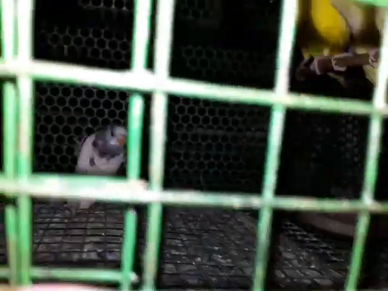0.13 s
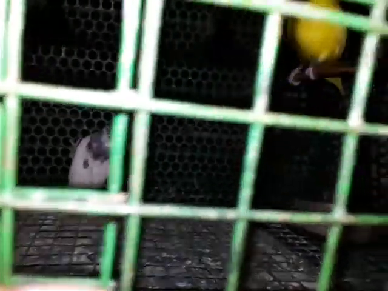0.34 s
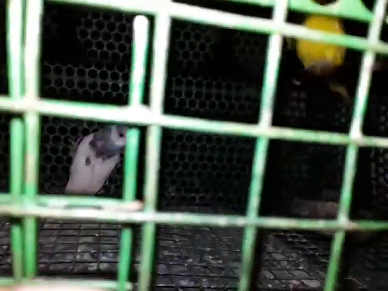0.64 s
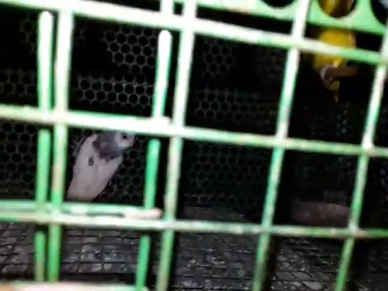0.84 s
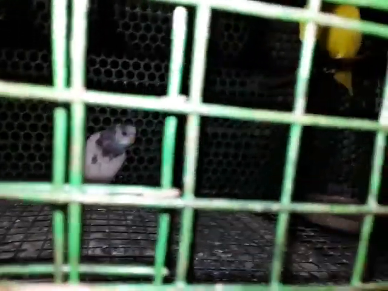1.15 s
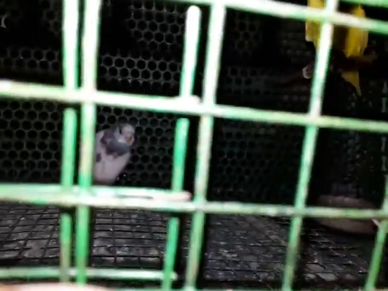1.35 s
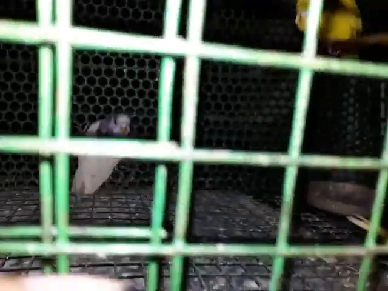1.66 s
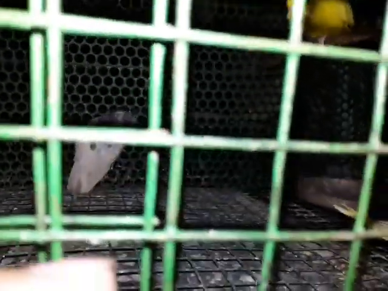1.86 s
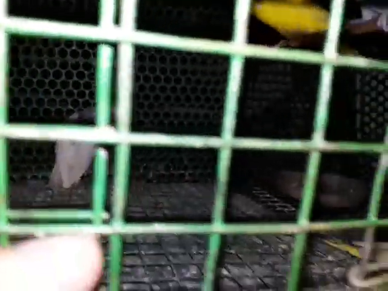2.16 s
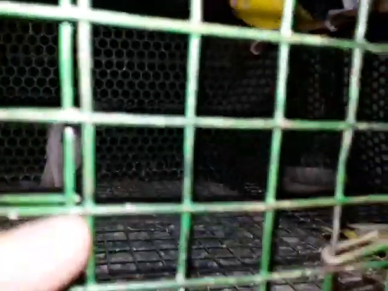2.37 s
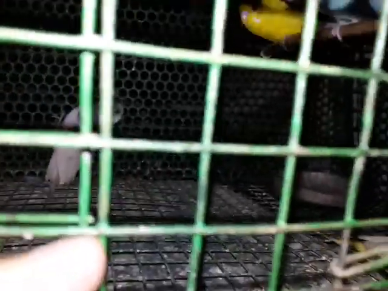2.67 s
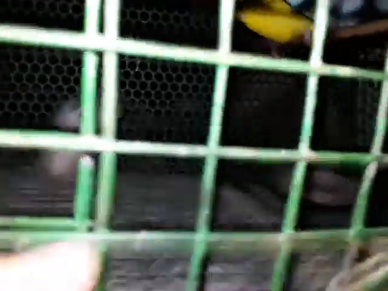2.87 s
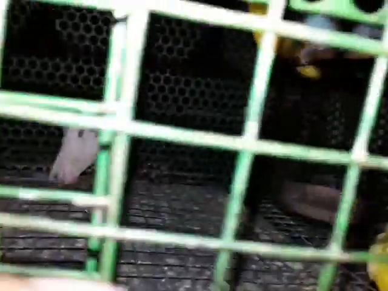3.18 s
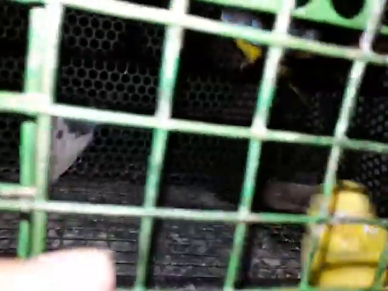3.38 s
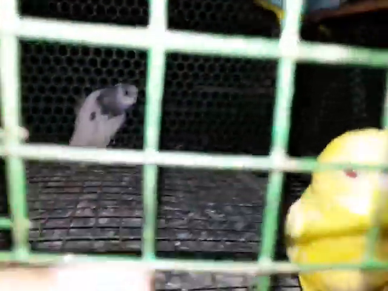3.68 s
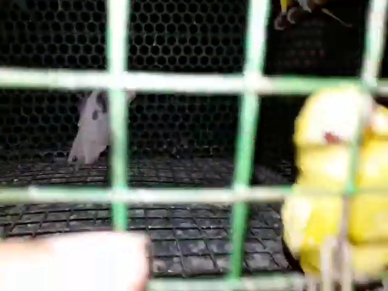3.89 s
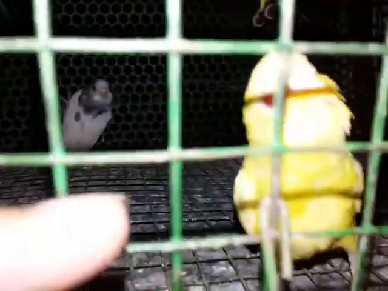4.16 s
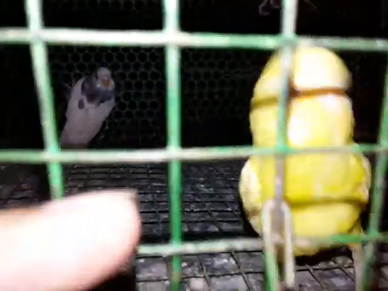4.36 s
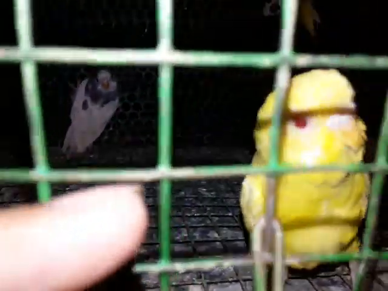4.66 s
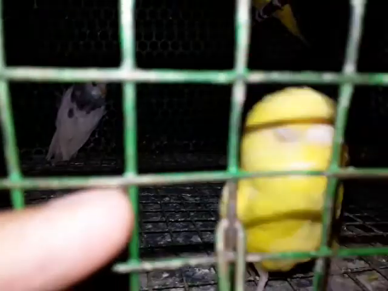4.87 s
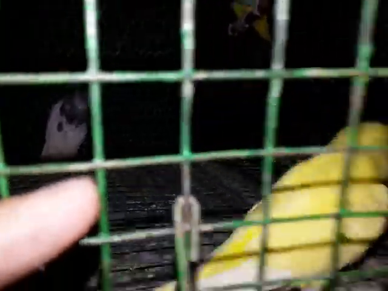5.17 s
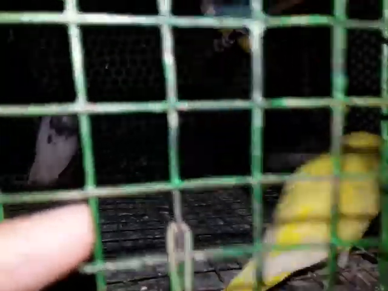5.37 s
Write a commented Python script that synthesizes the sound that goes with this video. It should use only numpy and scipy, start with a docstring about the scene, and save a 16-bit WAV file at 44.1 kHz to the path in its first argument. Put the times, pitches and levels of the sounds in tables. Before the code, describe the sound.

A quiet small room with a soft low hush, heard from just outside a wire cage of young budgerigars. Faint rustling never quite stops. From 0.1 to 1.5 seconds a few weak, high, wavering peeps come from further back, with soft wing flutters around 0.4 to 0.9 and light knocks on the bars. At 1.7 a rough, rapid warble lasts under a quarter second. Around 2.1 feathers hiss along the mesh and a thin, breathy whistle swells until about 2.9. From 2.64 to 3.0 one bird flaps hard, thumping and shaking the cage, with ringing metallic knocks and a sharp bright click. A loud, zigzagging, trilled chirp follows at 3.15, then scattered claw ticks to 3.7 and a small flutter. After near quiet, a short harsh two-pulse rasp sounds at 4.13. Rustling rises again, with a last cluster of claw ticks between 5.1 and 5.4.

```python
"""Young budgerigars in a wire cage in a small room, heard from just outside the bars.
First a bird peeps further away, gliding sine tones, over filtered noise for the room and faint low tones.
Wing beats (noise bursts and feather clicks) bump the cage, then a rough warble and a thin noise whistle come in.
One bird flaps hard, shaking the cage and ringing its bars, and chirps loudly; a short rasp of pulses follows.
Claw ticks run through to a last cluster, with feathers brushing the mesh and an unbroken faint rustle."""
import sys
import numpy as np
from scipy import signal
from scipy.fft import rfft, irfft
from scipy.io import wavfile

SR = 44100
rng = np.random.default_rng(int(sys.argv[2]) if len(sys.argv) > 2 else 0)


def wav_out(sig):
    """Save sig, one row per channel (or a flat mono array), as 16-bit PCM at SR to the path in sys.argv[1]."""
    wavfile.write(sys.argv[1], SR, np.round(np.clip(np.atleast_2d(sig).T, -1, 1) * 32767).astype(np.int16))


N = 243873
T = np.arange(N) / SR


def undb(db):
    """Decibels to gain."""
    return 10 ** (np.asarray(db) / 20)


def unit(x):
    """Scale to rms 1."""
    return x / np.sqrt(np.mean(x ** 2) + 1e-18)


def white():
    """White noise as long as the scene."""
    return rng.standard_normal(N)


def colour(x, points):
    """Filter by a causal, minimum-phase response through (Hz, dB) points; white noise keeps its power."""
    hz, db = np.transpose(points)
    size = 8192
    log_hz = np.log(np.fft.rfftfreq(size, 1 / SR) + 1)
    gain = unit(undb(np.interp(log_hz, np.log(hz), db)))
    # folding the cepstrum forward in time makes the response causal
    cepstrum = irfft(np.log(gain + 1e-9))
    cepstrum[1:size // 2] *= 2
    cepstrum[size // 2 + 1:] = 0
    response = irfft(np.exp(rfft(cepstrum)))
    return signal.fftconvolve(x, response)[:len(x)]


def resonate(x, hz, width_hz):
    """One resonance, gain 1 at its centre."""
    hz = min(hz, SR * .45)
    b, a = signal.iirpeak(hz, hz / min(width_hz, SR / 4), fs=SR)
    return signal.lfilter(b, a, x)


def ring_modes(x, modes):
    """Sum of resonances, one per (Hz, width Hz, dB) row."""
    return sum(undb(db) * resonate(x, hz, width_hz) for hz, width_hz, db in modes)


def walk(rate):
    """Random drift with a spread near 1: straight lines between `rate` random points a second."""
    knots = rng.standard_normal(N // 8)
    return np.interp(T * rate, np.arange(len(knots)), knots)


def grains(rate, spread_db):
    """Tiny clicks of very unequal size, `rate` a second on average, as from feather barbs."""
    sizes = undb(spread_db * np.minimum(rng.exponential(size=N), 5))
    return unit((rng.random(N) < rate / SR) * rng.standard_normal(N) * sizes)


def swells(rows):
    """Gain of sounds that rise evenly, hold and die away exponentially; their powers add."""
    power = np.zeros(N)
    for s, rise, hold, decay, db in rows:
        past = np.maximum(T - s - rise - hold, 0)
        power += (undb(db) * np.clip((T - s) / rise, 0, 1) * np.exp(-past / decay)) ** 2
    return np.sqrt(power)


def arc(u, start, middle, end):
    """Pitch that bends through three values as u runs from 0 to 1."""
    return np.polyval(np.polyfit([0, .5, 1], [start, middle, end], 2), u)


def glides(rows, waver, waver_rate):
    """Soft, wavering sine notes that swell and fade along an arc of pitch."""
    out, drift = np.zeros(N), 1 + waver * walk(waver_rate)
    for s, length, start_hz, middle_hz, end_hz, db in rows:
        u = np.clip((T - s) / length, 0, 1)
        phase = 2 * np.pi * np.cumsum(arc(u, start_hz, middle_hz, end_hz) * drift) / SR
        out += undb(db) * np.sqrt(8 * u * (1 - u)) * np.sin(phase)
    return out


def room(x, wet_db, t60=0.3, treble_t60=0.29, near_db=-9, near_s=0.0074):
    """Direct sound, quick reflections from the cage tray and walls, and the tail of a small room."""
    t = T[:SR // 2]
    noise = rng.standard_normal(len(t))
    low = signal.sosfiltfilt(signal.butter(2, 5500, fs=SR, output="sos"), noise)
    tail = low * undb(-60 * t / t60) + (noise - low) * undb(-60 * t / treble_t60)
    tail *= t > .006
    # sparse random echoes
    near = rng.standard_normal(len(t)) * (rng.random(len(t)) < .03) * np.exp(-t / near_s) * (t > .002)
    response = (undb(wet_db) * unit(tail) + undb(near_db) * unit(near)) / np.sqrt(len(t))
    return x + signal.fftconvolve(x, response)[:N]


# Tone of the quiet room. Each row: frequency in Hz, relative level in dB.
ROOM_COLOUR = [(25, -22.5), (60, -4.5), (115, 2), (400, -6.5), (700, -13.5), (2200, -23), (4700, -23.5),
               (7000, -37), (9700, -20), (15800, -22)]


def room_tone():
    """Steady filtered noise, its level drifting slightly."""
    return colour(white(), ROOM_COLOUR) * undb(-65.5 + 0.76 * walk(14))


# Faint low tones. Each row: start in seconds, length in seconds, start, middle and end pitch in Hz
# before the waver, relative level in dB.
FAR_TONES = [(.215, .14, 335, 325.3, 335, -55.5), (.47, 0.2, 519, 532, 510, -62),
             (3.37, 0.12, 394.2, 418.5, 448, -50.5)]


def far_tones():
    """Low gliding sines with more reverberation than direct sound."""
    return room(glides(FAR_TONES, waver=0.036, waver_rate=120) * undb(-4.5), wet_db=3.5)


# Faint whistle. Each row: start, rise, hold and decay in seconds, level in dB.
WHISTLE_SWELLS = [(2.1, 0.4, 0.31, 0.081, -61), (4.68, 0.21, 0.3, 0.048, -70.5)]


def whistle():
    """Noise through two equal narrow resonances in a row gives a thin, unsteady whistle."""
    hz, width_hz = 1335, 150  # of each resonance
    narrow = resonate(resonate(white(), hz, width_hz), hz, width_hz)
    return unit(narrow) * swells(WHISTLE_SWELLS)


# Bouts of rustling as the birds move. Each row: start, rise, hold and decay in seconds, relative level in dB.
RUSTLE_BOUTS = [(0, 0.0021, .62, 0.02, -68), (1.9, 0.14, 0.75, 0.066, -65), (2.83, 0.046, 0.83, 0.17, -60),
                (4.7, 0.57, 0.016, 0.2, -67.5)]
# Tone of the rustle. Each row: frequency in Hz, relative level in dB.
RUSTLE_TONE = [(400, -14), (1300, -1), (2200, -8), (4400, -8.5), (7000, -27), (9700, -14), (15500, -21)]
# Hollow tone of the cage, also of the wing air. Each row: frequency in Hz, relative level in dB.
HOLLOW_TONE = [(100, -22.5), (250, -6.5), (400, -2), (1100, -13), (2500, -41.5)]
# Cage shaking under the flapping. Each row: start, rise, hold and decay in seconds, relative level in dB.
SHAKE_SWELLS = [(2.82, .03, .16, 0.17, -55)]
# Modes of the cage and its tray, rung by the wings too; the first colours the shake.
# Each row: frequency in Hz, width in Hz, relative level in dB.
CAGE_MODES = [(370, 21, 3), (837, 97, 0.5), (1224, 99, -9.5), (1574, 160, -15)]


def stirring():
    """Small movements rustle, sound the hollow cage and shake it."""
    fidget_db = -74.5  # floor of movement that never stops
    movement = np.hypot(swells(RUSTLE_BOUTS), undb(fidget_db))
    rustle = colour(grains(rate=2600, spread_db=1.5), RUSTLE_TONE) * undb(2 * walk(37) - 0.5)
    hollow = colour(white(), HOLLOW_TONE) * undb(2 * walk(26))
    shake = colour(white(), [(25, -24.5), (55, -7.5), (85, -0.5), (200, -11), (1500, -71.0)])
    tray_hz, tray_width_hz, _ = CAGE_MODES[0]
    tray = unit(resonate(white(), tray_hz, tray_width_hz))
    shaking = (undb(0.5) * shake + undb(-2.5) * tray) * swells(SHAKE_SWELLS)
    return (rustle + hollow) * movement + shaking


# Strokes along the mesh. Each row: start, rise, hold and decay in seconds, level in dB before the flicker.
BRUSH_STROKES = [(.875, 0.024, 0.028, 0.035, -64), (2.134, 0.0086, 0.037, 0.028, -47),
                 (2.17, 0.11, 0.096, 0.027, -51.5), (2.989, 0.0092, .003, .0213, -40.5),
                 (3.055, 0.039, 0.0046, 0.041, -47)]
# Tone of the brushing. Each row: frequency in Hz, relative level in dB.
BRUSH_TONE = [(1180, -43.5), (2000, -13.5), (3120, -10.5), (4670, -1), (6810, -16.5), (9680, 2),
              (15500, -18)]


def brushing():
    """Fine friction along the mesh: very dense clicks blur into a flickering hiss."""
    hiss = colour(grains(rate=56000, spread_db=2.0), BRUSH_TONE) * undb(1.2 * walk(83))
    return hiss * swells(BRUSH_STROKES)


# Far bird's peeps. Each row: start in seconds, length in seconds, start, middle and end pitch in Hz
# before the waver, relative level in dB.
FAR_PEEPS = [(.09, 0.049, 2136, 2202, 2180, -66), (.735, 0.046, 2350, 2320, 2130, -68.5),
             (1.128, 0.099, 2100, 2130, 2334, -61.5), (1.388, 0.064, 2010, 2214, 2050, -64)]


def far_peeps():
    """Wavering, gliding sines from a bird further away, well into the room sound."""
    return room(glides(FAR_PEEPS, waver=0.0394, waver_rate=350) * undb(-2.0), wet_db=-1.5)


# Claws and beaks on the wire. Each row: start in seconds, relative level in dB, brightest frequency in Hz.
CLAW_TICKS = [(0.506, -56, 5200), (2.044, -50, 3450), (2.9826, -31.5, 7140), (3.298, -41.5, 5000),
              (3.381, -47, 5540), (3.459, -50, 4460), (3.669, -44.5, 5180), (5.14, -54, 4630),
              (5.164, -47, 3350), (5.221, -45.5, 7120), (5.269, -47.5, 5540), (5.339, -44, 3730)]
# Modes of the wire. Each row: frequency in Hz, width in Hz, relative level in dB.
WIRE_MODES = [(3854, 522, -4), (4660, 610, 3), (5660, 110, -9.5)]


def claws():
    """A sharp contact rings the wire for a few milliseconds and knocks the tray faintly."""
    out, t = np.zeros(N), T[:SR // 20]
    for s, db, bright_hz in CLAW_TICKS:
        contact = rng.standard_normal(len(t)) * np.exp(-t / .0006)
        tick = resonate(contact, bright_hz, 0.4 * bright_hz)
        i = int(s * SR)
        out[i:i + len(t)] += undb(db + 6.5) * tick / np.abs(tick).max()
    ring = ring_modes(out, WIRE_MODES)
    knock = resonate(out, 380, 200) + resonate(out, 1277, 400)
    return room(out + undb(3.0) * ring + undb(3.0) * knock, wet_db=-11.0, near_db=-9.0)


# Feet and bodies on the bars. Each row: start in seconds, direct peak level in dB,
# brightest frequency of the contact in Hz.
BAR_KNOCKS = [(.394, -52, 3500), (1.012, -44.5, 3700), (1.974, -46.5, 4000), (2.64, -55, 3800),
              (2.697, -43.5, 3300), (2.801, -42.5, 2300), (2.85, -38, 2200), (2.869, -31.5, 4200),
              (2.903, -32.5, 2400), (2.93, -27, 3700), (2.955, -33, 3200)]
# Modes of the bars. Each row: frequency in Hz before detuning, relative level in dB.
BAR_MODES = [(915, -1), (1690, 0), (2370, -2), (2690, 2), (3450, -3), (4350, 0)]


def bars():
    """A knock buzzes briefly and rings the bars; every spot struck has its own tuning."""
    buzz_s, width_hz, detune = .004, 65, .02  # contact decay, mode width, spread of tuning as a share
    out, t = np.zeros(N), T[:SR // 8]
    for s, db, bright_hz in BAR_KNOCKS:
        contact = resonate(rng.standard_normal(len(t)) * np.exp(-t / buzz_s), bright_hz, bright_hz)
        tuning = 1 + detune * rng.standard_normal(len(BAR_MODES))
        modes = [(hz * k, width_hz, mode_db) for (hz, mode_db), k in zip(BAR_MODES, tuning)]
        knock = ring_modes(contact, modes) + undb(-13.0) * contact
        i = int(s * SR)
        out[i:i + len(t)] += undb(db) * knock / np.abs(knock).max()
    return room(out, wet_db=-8.0)


# Wing beats and bumps on the cage. Each row: start in seconds, relative level in dB, decay in seconds,
# treble in dB over the beat, low puff in dB over the beat.
WING_BEATS = [(.388, -48, 0.032, -1, 6), (0.487, -51, 0.026, 3, -2), (0.862, -59, .16, 3.5, 5.5),
              (2.639, -44, .008, -24, -8), (2.694, -39.5, 0.023, -20, -4), (2.849, -44, 0.011, -23, -7),
              (2.869, -41.5, .03, -3, -16.5), (2.928, -39, 0.031, 2.5, -7), (3.656, -54, 0.024, -2.5, 1)]
# Tone of the beats. Each row: frequency in Hz, relative level in dB.
BEAT_TONE = [(30, -23.5), (98, -4.5), (218, -25.5), (368, -3.5), (621, -15.5), (2600, -10), (4240, -13.5),
             (6980, -36), (15500, -19.5)]


def wings():
    """Each beat bumps the cage and puffs air against the tray, while a burst of feather clicks dies away."""
    body, treble, bumps, puffs = np.zeros((4, N))
    for s, db, decay, treble_db, puff_db in WING_BEATS:
        t = np.maximum(T - s, 0)
        burst = undb(db) * (1 - np.exp(-t / 0.0024)) * np.exp(-t / decay)
        slow_puff = undb(db + puff_db) * (1 - np.exp(-t / 0.0076)) * np.exp(-t / (1.77 * decay))
        body += burst
        treble += burst * undb(treble_db)
        puffs += burst * undb(puff_db) + slow_puff
        bumps += undb(db) * (t > 0) * np.exp(-t / 0.0031)
    feathers = grains(rate=7000, spread_db=1.5) * undb(2.0 * walk(140))
    dull = signal.butter(4, 5000, fs=SR, output="sos")
    low_feathers = signal.sosfiltfilt(dull, feathers)
    blows = signal.sosfilt(dull, white() * bumps) + low_feathers * body
    bright = (feathers - low_feathers) * treble
    beats = colour(blows + bright, BEAT_TONE) * undb(-1.5)
    air = colour(white(), HOLLOW_TONE) * puffs * undb(-15.5)
    ring = ring_modes(blows, CAGE_MODES) * undb(11.0)
    return room(air + beats + ring, wet_db=-5.5)


# Pulses of the rasp. Each row: start, rise, hold and decay in seconds, relative level in dB.
RASP_SWELLS = [(4.127, 0.014, 0.012, 0.012, -36.5), (4.149, 0.0063, 0.013, 0.017, -32.5)]
# Broad throat resonances. Each row: frequency in Hz, relative level in dB.
RASP_TONE = [(700, -39), (2100, -9), (3710, 0), (5120, -3), (6050, 2), (7590, -20), (9070, -8),
             (11000, -22), (15500, -17.5)]


def rasp():
    """A harsh squawk: chaotic pulses in broad throat resonances."""
    source = colour(grains(rate=7000, spread_db=1.5), RASP_TONE) * undb(2 * walk(300))
    return room(source * swells(RASP_SWELLS) * undb(-1.0), wet_db=-3.5)


def syrinx(hz, second_db, jitter, flutter_db, third_db, upper_db, trill_hz, trill):
    """A fast-gliding, trilling membrane tone with thin overtones; the throat mostly favours its second harmonic."""
    shiver = trill * np.sin(2 * np.pi * trill_hz * T + 2 * walk(100))
    phase = 2 * np.pi * np.cumsum(hz * (1 + shiver + jitter * walk(1500))) / SR
    second = undb(second_db)
    # the first two harmonics trade places at constant power
    tone = (np.sin(phase) + second * np.sin(2 * phase)) / np.sqrt(1 + second ** 2)
    tone += undb(third_db) * np.sin(3 * phase)
    tone += undb(upper_db) * sum(np.sin(k * phase) * (4 / k) ** 1.3 for k in range(4, 10))
    return tone * np.sqrt(2) * undb(flutter_db * walk(450))


def gate(start, end):
    """A sung note opens and closes within a few milliseconds."""
    attack_s, release_s = .007, 0.0026
    opening = np.clip((T - start) / attack_s, 0, 1)
    closing = np.clip((end - T) / release_s + .5, 0, 1)  # half closed at the end time
    return opening * closing


# Notes of the warble. Each row: start in seconds, length in seconds, start, middle and end pitch in Hz
# before trill and jitter, relative level in dB, second harmonic in dB over the first, roughness from 0 to 1.
WARBLE_NOTES = [(1.69, 0.0097, 2550, 2290, 2060, -48, 10, 0.3),
                (1.697, 0.029, 1740, 1645, 1650, -42, 25, 0.25),
                (1.721, 0.012, 1540, 1380, 1130, -45.5, 14, 0.6),
                (1.742, 0.035, 1232, 1373, 1306, -46.5, 24, 0.54),
                (1.765, 0.022, 2100, 2285, 2200, -42.5, 25, 0.25),
                (1.781, 0.0312, 1770, 1880, 1952, -34, 31, 0.43),
                (1.811, 0.024, 1750, 1900, 2350, -46, -15, .3),
                (1.832, .056, 2252, 2195, 1805, -43.5, -20, 1)]


def warble():
    """A run of rough notes from the back of the cage, each bending along one arc of pitch."""
    out = np.zeros(N)
    for s, length, start_hz, middle_hz, end_hz, db, second_db, rough in WARBLE_NOTES:
        u = np.clip((T - s) / length, 0, 1)
        hz = arc(u, start_hz, middle_hz, end_hz)
        tone = syrinx(hz, second_db, jitter=0.05035 * rough, flutter_db=3.0, third_db=-42, upper_db=-30,
                      trill_hz=261.0, trill=0.13 * rough)
        out += tone * undb(db) * gate(s, s + length)
    return room(out * undb(-4.5), wet_db=-1.5, near_db=-4.5)


# Path of the loud chirp. Each row: time in seconds, pitch in Hz before trill and jitter,
# relative level in dB, second harmonic in dB over the first.
CHIRP_PATH = [(3.141, 1200, -46, 1.5), (3.149, 1256, -37.5, 4), (3.153, 1950, -21.5, 34.5),
              (3.161, 1984, -23.5, 23), (3.165, 1656, -26, 16.5), (3.177, 1800, -26, 18),
              (3.189, 2125, -15.5, 24), (3.193, 1510, -20, 31.5), (3.201, 1659, -12, 39.5),
              (3.212, 2077, -14.5, 32), (3.217, 1854, -27, 8), (3.226, 1997, -25.5, -2),
              (3.231, 2385, -21.5, -7.5), (3.239, 2413, -20.5, -4), (3.24, 1500, -25, 30),
              (3.244, 2047, -22.5, 22.5), (3.253, 1714, -15.5, 46.5), (3.270, 1998, -21, 33)]


def chirp():
    """One loud call close by: its pitch zigzags, and it drops briefly to its fundamental near the end."""
    s, *columns = np.transpose(CHIRP_PATH)
    hz, db, second_db = (np.interp(T, s, column) for column in columns)
    tone = syrinx(hz, second_db, jitter=.03, flutter_db=3.5, third_db=-34.5, upper_db=-31.5,
                  trill_hz=318.2, trill=0.026)
    return room(tone * undb(db - 3.0) * gate(s[0], s[-1]), wet_db=-7.5, near_db=-7.0)


def scene():
    """All the birds, the cage and the quiet room, as one channel."""
    background = room_tone() + far_tones() + whistle()
    cage = stirring() + brushing() + claws() + bars() + wings()
    birds = far_peeps() + rasp() + warble() + chirp()
    return (background + cage + birds)[None]


def record(dry):
    """A steep low-pass cuts the top."""
    top_hz = 15900
    return signal.sosfilt(signal.ellip(10, .2, 70, top_hz, fs=SR, output="sos"), dry)


dry = scene()
out = record(dry)
wav_out(out)
```